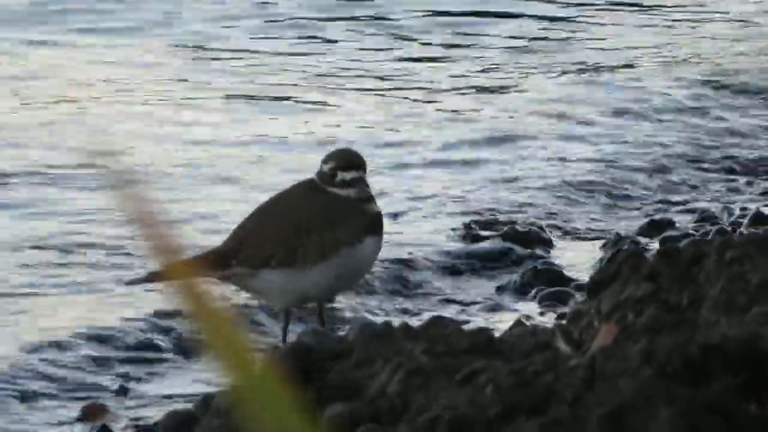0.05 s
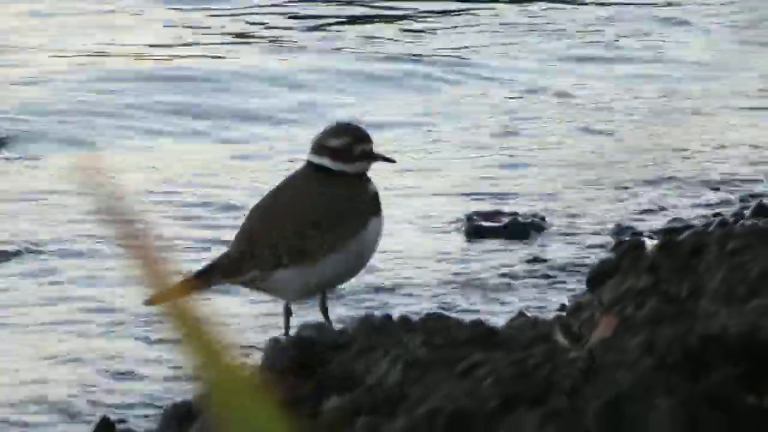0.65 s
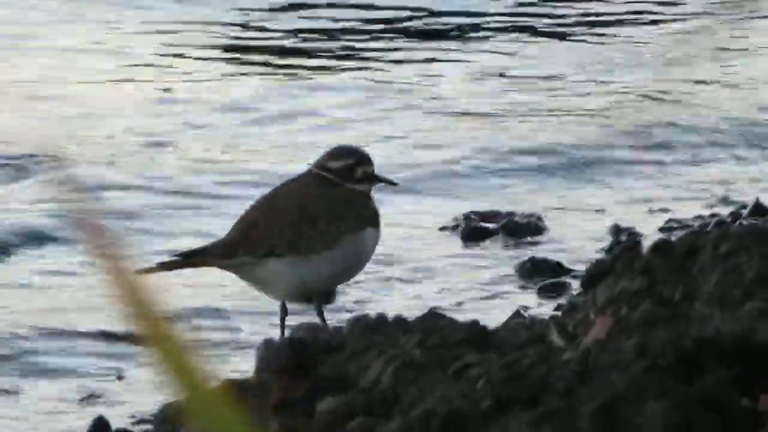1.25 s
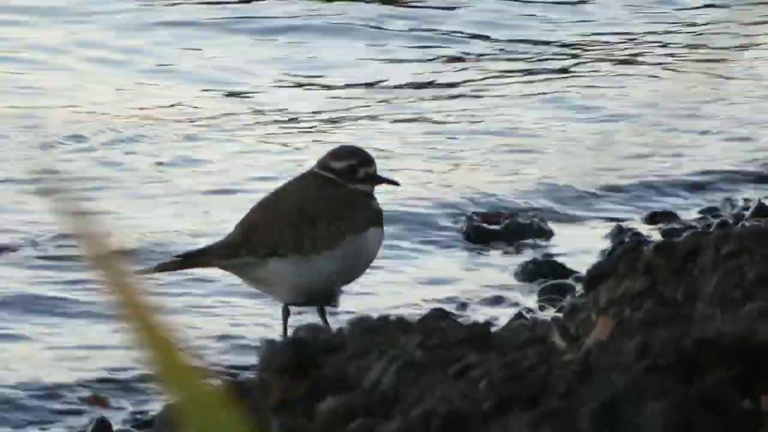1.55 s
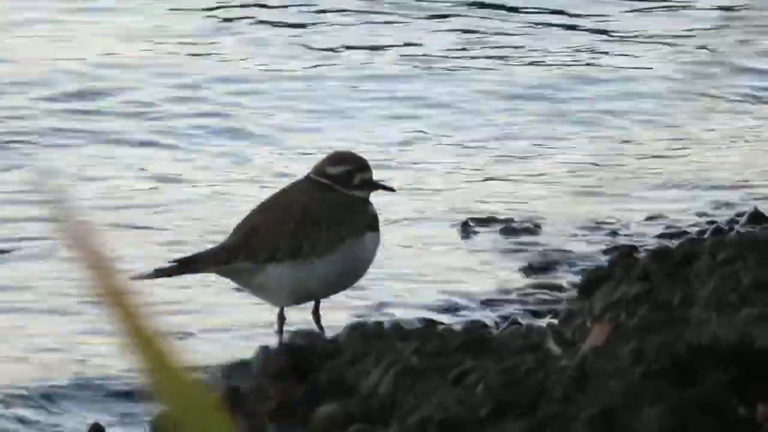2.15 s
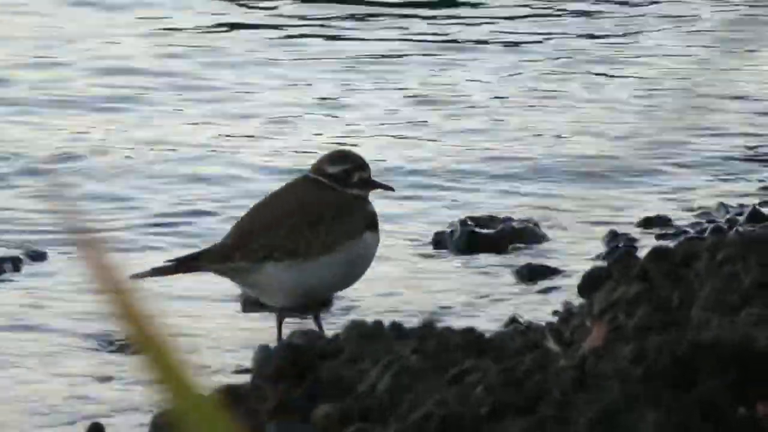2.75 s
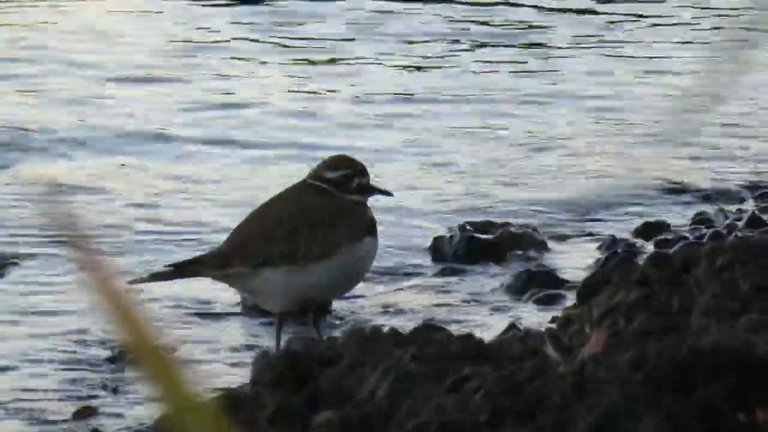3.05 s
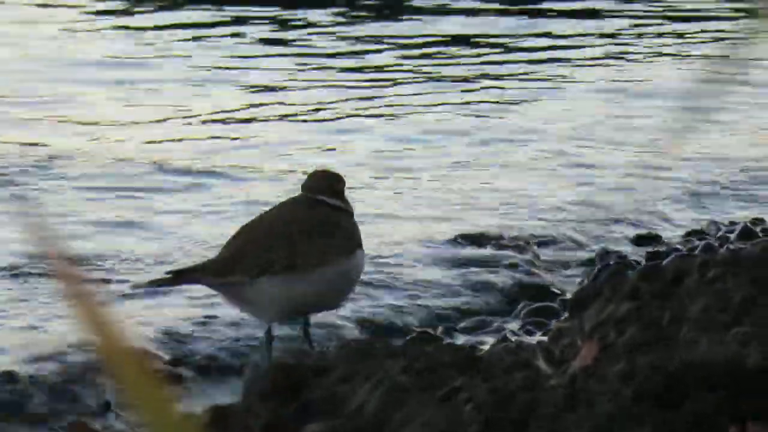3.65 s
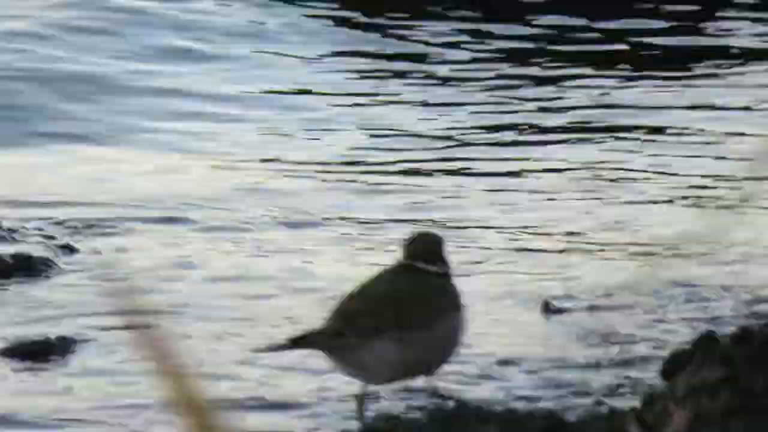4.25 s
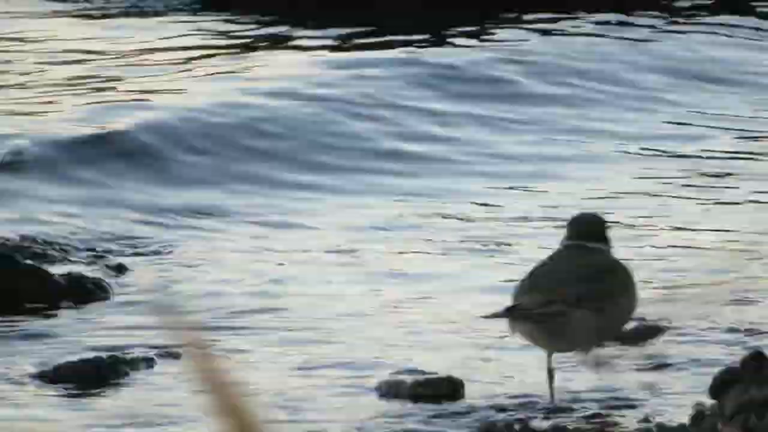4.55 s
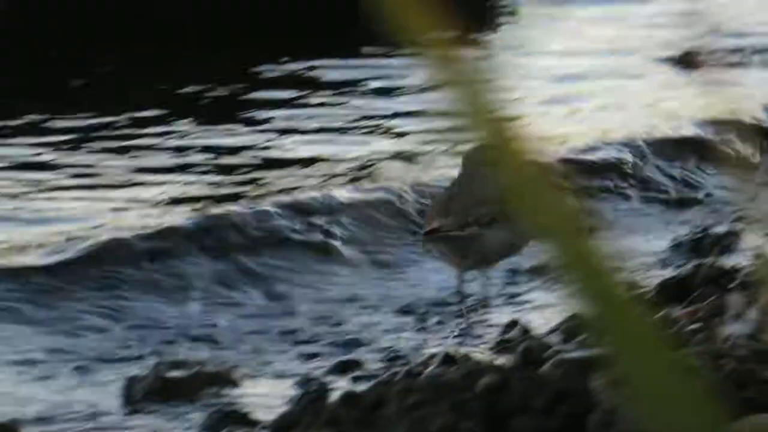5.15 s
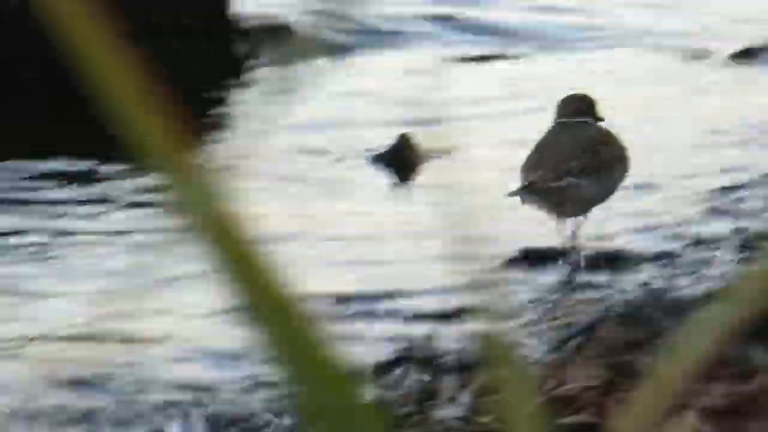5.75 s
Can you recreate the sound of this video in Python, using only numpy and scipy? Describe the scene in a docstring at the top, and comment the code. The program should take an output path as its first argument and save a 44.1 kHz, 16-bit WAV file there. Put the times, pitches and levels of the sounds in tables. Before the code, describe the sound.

A steady low rumble of far traffic and a light breeze lie behind gentle lapping at a rocky water's edge. Wavelets arrive about every half second, bubbling, dripping and leaving a fine crackle of foam. A few soft whistles and short reedy yelps of a water bird echo from the bank, then a faint high chirping follows in a lull before one last deeper wave. Two microphones stand close to the waterline.

```python
"""A stony shore in a light, hissing breeze, with a distant road rumbling across the water.
Small waves fizz and gulp between the stones, throw splashes and drops and leave crackling foam;
each of these sounds is built from damped oscillations, the ringing of air bubbles trapped in water.
A water bird yelps in reedy harmonics that echo from the bank, thin whistles answer and a small bird
chirps far off. Two close microphones hear the scene, with the bass in mono."""
import sys
import numpy as np
from scipy import signal
from scipy.fft import rfft, irfft
from scipy.io import wavfile
from scipy.ndimage import uniform_filter1d

SR = 44100
rng = np.random.default_rng(int(sys.argv[2]) if len(sys.argv) > 2 else 0)


def store_pcm(level_fs):
    """Save levels as 16-bit WAV."""
    pcm = np.round(np.clip(level_fs, -1, 1) * 32767).astype(np.int16)
    wavfile.write(sys.argv[1], SR, np.atleast_2d(pcm).T)


N = 255780
TIME = np.arange(N) / SR
FREQS = np.maximum(np.arange(N // 2 + 1) * SR / N, 1)

# wavelets reaching the stones: crest t/s, run-up/s, wash level/dB, gulp level/dB, crackle level/dB
WAVELETS = [(.74, .09, -58, -53, -70), (1.12, .12, -60, -54, -79), (1.38, .1, -61, -54, -79),
            (1.85, .1, -58.5, -53, -70), (2.29, .08, -63, -56, -73), (2.71, .06, -61, -54, -72),
            (3.27, .15, -57.5, -49, -69), (3.71, .17, -55, -44, -68), (4.15, .1, -63, -56, -73),
            (5.68, .17, -57.5, -39, -73)]


def undb(db):
    """Amplitude ratio of a level in decibels."""
    return 10 ** (np.asarray(db) / 20)


def level(x, db):
    """Normalisation to an rms level."""
    return x * undb(db) / np.sqrt(np.mean(x ** 2))


def add(out, t, x):
    """Superposition: x joins out from time t on."""
    start = max(int(t * SR), 0)
    part = out[..., start:start + x.shape[-1]]
    part += x[..., :part.shape[-1]]


def walk(rate_hz):
    """Random modulation: held values, smoothed twice, with a spread near 1."""
    held = rng.standard_normal(512)[(TIME * rate_hz).astype(int) % 512]
    width = int(SR / rate_hz)
    return 1.3 * uniform_filter1d(uniform_filter1d(held, width), width)


def restless_noise(colour, flicker_db, rate_hz):
    """Amplitude modulation of coloured noise: each octave band wavers independently."""
    hz, db = np.transpose(colour)
    spectrum = rfft(rng.standard_normal(N)) * undb(np.interp(np.log(FREQS), np.log(hz), db))
    octave = np.log2(FREQS / 16)
    bands = (irfft(spectrum * np.maximum(1 - abs(octave - k), 0), N) for k in range(12))
    return sum(band * undb(flicker_db * walk(rate_hz)) for band in bands)


def place(x, pan_db, lag_s_per_db=1.2e-5, shadow_hz=560):
    """Time and level difference: the nearer microphone leads and, above the bass, is louder; + is left."""
    hz = np.arange(len(x) // 2 + 1) * SR / len(x)
    lead = np.exp(1j * np.pi * hz * pan_db * lag_s_per_db)
    left = lead * undb(pan_db / 2 * hz ** 2 / (hz ** 2 + shadow_hz ** 2))
    return irfft(rfft(x) * np.array([left, 1 / left]), len(x))


def road(drone_hz=124.5):
    """Broadband and tonal noise: far engines rumble, tyres roar, and one engine drones in two harmonics."""
    # traffic spectrum: f/Hz, relative level/dB
    colour = [(18, -23), (35, -5), (66, 0), (115, .5), (185, -6), (330, -12.8), (500, -13.4), (800, -11.3),
              (1350, -21.2), (1900, -33), (3000, -42), (6000, -55), (12000, -70)]
    # one engine's drone: t/s, fundamental level/dB, octave level/dB
    drone_levels = [(0, -55, -61), (.7, -47, -56), (1.3, -49, -45), (1.9, -49, -46.5), (2.4, -48, -54),
                    (3.3, -52, -57), (5.8, -55, -59)]
    roar = level(restless_noise(colour, flicker_db=.5, rate_hz=5), -32.1) * undb(.25 * walk(1.2))
    times, *levels_db = np.transpose(drone_levels)
    fundamental, octave = (undb(np.interp(TIME, times, db)) for db in levels_db)
    phase = 2 * np.pi * np.cumsum(drone_hz + .6 * walk(4)) / SR
    drone = np.sqrt(2) * (fundamental * np.sin(phase) + octave * np.sin(2 * phase))
    return place(roar + drone * undb(2 * walk(5)), pan_db=2)


def breeze(db=-49.5, side_db=-1):
    """Diffuse field: a soft hiss from all sides is only weakly correlated between the microphones."""
    # spectrum of breeze and far water: f/Hz, relative level/dB
    colour = [(100, -8), (220, -3), (430, 0), (540, -3), (1000, -.8), (2000, -6.8), (3200, -11.3),
              (5000, -14.6), (10000, -23.8), (13500, -29.3), (15300, -35)]
    mid, side = (level(restless_noise(colour, flicker_db=.4, rate_hz=8), db) for _ in range(2))
    side *= undb(side_db)
    return np.array([mid + side, mid - side]) / np.sqrt(2)


def bubble(hz, cycles, glide=.12):
    """Damped oscillator: a bubble rings down by 40 dB, rising in pitch as it nears the surface."""
    age = np.linspace(0, 1, int(cycles * SR / hz) + 4)
    envelope = (1 - np.exp(-2 * cycles * age)) * np.exp(-np.log(100) * age)
    return envelope * np.sin(2 * np.pi * cycles * (age + glide * age ** 2 / 2))


def bubbles(count, centre_hz, spread, cycles, scatter_db, pans_db=(-1, 1.5, 4)):
    """Shot noise: bubbles ring at random times along the waterline, most faint, a few strong; rms 1."""
    sides = np.zeros((3, N))
    for k, (when, pitch, size, ring) in enumerate(rng.random((count, 4))):
        hz = np.clip(centre_hz * (pitch / (1 - pitch)) ** (spread / 2), 120, 14000)
        size_db = -scatter_db * np.log(max(size, .02))
        add(sides[k % 3], when * N / SR, undb(size_db) * bubble(hz, cycles * (.5 + ring)))
    return level(sum(place(x, pan_db) for x, pan_db in zip(sides, pans_db)), 0)


def surge(crest_s, run_up_s, slower=1, drain_s=.17):
    """Exponential growth and decay: a wavelet's flow builds to its crest, then drains away."""
    age = (TIME - crest_s) / slower
    return np.exp(np.minimum(age / run_up_s, -age / drain_s))


def wash(calm_flow_db=-66, calm_gulp_db=-55):
    """Bubble resonance: small bubbles fizz and trickle, large ones gulp; the wavelets add in power."""
    fizz = bubbles(count=6000, centre_hz=4200, spread=.58, cycles=11, scatter_db=2.8)
    trickle = bubbles(count=1700, centre_hz=2000, spread=.4, cycles=18, scatter_db=2.4)
    gulps = bubbles(count=1000, centre_hz=350, spread=.7, cycles=7, scatter_db=2.2)
    flow_power, gulp_power = undb(calm_flow_db) ** 2, undb(calm_gulp_db) ** 2
    for t, run_up_s, wash_db, gulp_db, _ in WAVELETS:
        flow_power += (undb(wash_db) * surge(t, run_up_s)) ** 2
        gulp_power += (undb(gulp_db) * surge(t, run_up_s, slower=1.5)) ** 2  # hollows fill and empty
    running = undb(-3.8) * fizz + undb(.5) * trickle
    return running * np.sqrt(flow_power) + gulps * np.sqrt(gulp_power)


def plips(db=-65.5):
    """Stationary random process: stray bubbles pop between the stones all the time."""
    return undb(db) * bubbles(count=200, centre_hz=2000, spread=.3, cycles=22, scatter_db=1.8)


def plops():
    """Free oscillation: single pockets of air ring as the water closes over them."""
    # air pockets: t/s, level/dB, f/Hz
    pockets = [(.161, -39, 2050), (.786, -35.5, 3450), (.791, -39, 2600), (.815, -44, 3600),
               (.862, -39, 2450), (1.342, -39, 2480), (1.843, -35, 2660), (1.856, -38, 2350),
               (1.911, -38, 1630), (1.99, -29, 1820), (2.007, -33, 1920), (2.019, -37, 1800),
               (2.686, -40, 3300), (3.151, -35, 2600), (3.276, -38, 2950), (3.339, -42, 4500),
               (3.422, -41, 2560), (3.435, -42, 4100), (3.628, -37, 2450), (3.661, -32, 2050),
               (3.676, -36, 2200), (3.729, -34, 1750), (3.92, -41, 2850), (4.108, -31, 1450),
               (4.126, -33, 1450), (4.546, -36.5, 2350), (5.66, -40, 2650), (5.714, -33, 350),
               (5.721, -33, 1700), (5.751, -39, 3250), (5.781, -36, 2000)]
    out = np.zeros(N)
    for t, db, hz in pockets:
        add(out, t, undb(db) * bubble(hz, cycles=20))
    return place(out, pan_db=2.2)


def drops(cycles=10, droplets=4, scatter_s=.012, droplet_db=-11):
    """Impact transients: tiny drops tick on the nearest stones and scatter into fainter droplets."""
    # drop impacts: t/s, level/dB, f/Hz, pan/dB
    impacts = [(.384, -46, 11000, 2), (.465, -46, 13000, .8), (.693, -48, 13500, 1), (.717, -47, 8500, 1),
               (.78, -43.5, 13300, .4), (.788, -41, 5100, 1), (.855, -47, 11000, .8),
               (1.189, -43.5, 13000, .9), (1.215, -42, 13000, .9), (1.797, -42, 7000, 2.6),
               (1.819, -44, 11000, 2.5), (1.856, -40, 10500, 2.6), (1.912, -46, 9500, 2.6),
               (2.052, -38, 6300, 2.2), (2.084, -43, 6900, 2.2), (2.221, -45, 13000, 2.7),
               (2.274, -37, 5400, 2.2), (2.385, -42, 12500, 2.4), (2.54, -45, 13500, .8),
               (2.639, -38, 13000, 1.5), (2.692, -43, 7000, 1.2), (2.725, -45, 13000, 1.6),
               (2.803, -46, 13000, 1.7), (3.063, -43, 5900, 2), (3.101, -45, 10500, 2.2),
               (3.555, -43, 8000, 2), (3.615, -33, 4400, 2.2), (3.679, -42, 5900, 2.2),
               (3.707, -41, 6250, 2.2), (3.748, -31, 4600, 2.2), (3.798, -44, 12000, 2.7),
               (4.003, -42, 11500, 2.4), (4.083, -41, 12500, 2.7), (4.236, -44, 12500, 2.7),
               (5.598, -44, 11500, 2.7)]
    out = np.zeros((2, N))
    for t, db, hz, pan_db in impacts:
        tick = np.zeros(SR // 20)
        add(tick, 0, bubble(hz, cycles))
        for when, pitch in rng.random((droplets, 2)):
            add(tick, scatter_s * when, undb(droplet_db) * bubble(hz * (1 - pitch / 2), cycles / 2))
        add(out, t, undb(db) * place(tick, pan_db))
    return out


def splashes(count=32, spread=.17, spray_db=-15, spray_ratio=2.3):
    """Air entrainment: a crest folds over a stone, trapping like-sized bubbles under a finer spray."""
    # folding crests: t/s, rms level/dB, bubble f/Hz, duration/s
    crests = [(.69, -58, 2900, .055), (.778, -57, 3200, .025), (.857, -57, 2500, .016),
              (.887, -57, 2800, .028), (1.338, -55.5, 2300, .07), (1.492, -48, 1250, .025),
              (1.53, -55, 2100, .08), (1.835, -58, 2400, .03), (1.986, -47, 1400, .035),
              (2.683, -58.5, 2900, .06), (3.264, -54, 2800, .045), (3.545, -57, 2700, .018),
              (3.648, -49.5, 1900, .035), (3.75, -53.5, 1800, .06), (3.895, -59, 2950, .035),
              (5.53, -58, 3200, .07), (5.645, -58, 2600, .07), (5.673, -35, 520, .008),
              (5.66, -46, 750, .06), (5.69, -53, 1600, .08)]
    out = np.zeros(N)
    for t, db, hz, duration in crests:
        cluster = np.zeros(SR // 8)
        for k, (when, pitch, size, fine) in enumerate(rng.standard_normal((count, 4))):
            onset = duration * (k + .4 * when) / count
            spray_hz = min(spray_ratio * hz * np.exp(.45 * fine), SR / 3)
            add(cluster, onset, undb(2.2 * size) * bubble(hz * np.exp(spread * pitch), cycles=14))
            add(cluster, onset, undb(spray_db) * bubble(spray_hz, cycles=5))
        cluster *= undb(db) * np.sqrt(duration * SR / np.sum(cluster ** 2))
        add(out, t, cluster)
    return place(out, pan_db=2.2)


def crackle():
    """Modulated shot noise: foam on the stones to the left bursts in tiny ticks after each wavelet."""
    ticks = bubbles(count=2600, centre_hz=11500, spread=.33, cycles=7, scatter_db=4.2,
                    pans_db=(2, 2.6, 3.1))
    foam_power = sum((undb(db) * surge(t, run_up_s=.04, slower=1.6)) ** 2 for t, *_, db in WAVELETS)
    return ticks * np.sqrt(foam_power)


def note(duration, pitches, harmonics_db, rough, quaver_s, swell=.7):
    """Frequency and amplitude modulation: a bird's note bends and quavers as it swells and fades."""
    age = np.linspace(0, 1, int(duration * SR))
    contour = np.polyfit(np.linspace(0, 1, len(pitches)), pitches, len(pitches) - 1)
    steps = age * duration / quaver_s
    jitter, shimmer = (np.interp(steps, np.arange(64), r) for r in rng.standard_normal((2, 64)))
    phase = 2 * np.pi * np.cumsum(np.polyval(contour, age) * (1 + rough * jitter)) / SR
    tone = sum(undb(db) * np.sin(k * phase) for k, db in enumerate(harmonics_db, 1))
    return np.sqrt(2) * tone * undb(1.5 * shimmer) * abs(np.sin(np.pi * age)) ** swell


def echoes(x, t60, wet_db, delay_s=.008):
    """Reverberation: scattered returns from the banks decay exponentially, unlike at each microphone."""
    t = TIME[:SR]
    tail = rng.standard_normal((2, SR)) * undb(-60 * t / t60) * (t > delay_s)
    tail *= undb(wet_db) / np.sqrt(np.sum(tail ** 2, axis=1, keepdims=True))
    return signal.fftconvolve(x[None], tail, axes=1)[:, :N]


def phrase(notes, rough, quaver_s, swell):
    """Gliding tones: a bird's run of notes, each a fundamental without overtones."""
    out = np.zeros(N)
    for t, duration, db, *pitches in notes:
        add(out, t, undb(db) * note(duration, pitches, [0], rough, quaver_s, swell))
    return out


def whistles():
    """Nearly pure tones: thin quavering notes rise and fall in an arc, blurred by distance."""
    # whistled notes: t/s, duration/s, level/dB, start f/Hz, middle f/Hz, end f/Hz
    notes = [(1.221, .062, -51, 2080, 2340, 1900), (1.337, .05, -58, 2420, 2650, 2520),
             (1.496, .057, -49, 2100, 2270, 2020), (1.792, .032, -53.5, 1960, 2050, 1920)]
    call = phrase(notes, rough=.024, quaver_s=.0012, swell=.35)
    return place(call, pan_db=2.2) + echoes(call, t60=.55, wet_db=-7.5)


def water_bird(throat_hz=2400, throat_width_hz=500, rise_hz_per_s=4700):
    """Source and filter: reedy rising yelps pass a throat resonance on the left and echo on the right."""
    # yelps: t/s, duration/s, start f/Hz, level/dB, tilt/(dB per harmonic), throat gain/dB
    yelps = [(1.474, .016, 808, -41.5, 1.1, -5), (1.495, .013, 740, -41.5, -1.5, -3),
             (3.126, .015, 730, -36, -.7, 3), (4.164, .022, 767, -37.5, 0, 1.5)]
    # voice spectrum, from the fundamental up: relative level/dB
    voice_db = [0, 0, -3.5, -15, -29, -27, -32, -26, -27, -31]
    # reflections from the bank: delay/s, relative level/dB
    reflections = [(.056, -17), (.078, -17), (.116, -20)]
    out = np.zeros(N)
    k = np.arange(len(voice_db))
    for t, duration, hz, db, tilt_db, throat_db in yelps:
        throat = np.exp(-(((k + 1) * hz - throat_hz) / throat_width_hz) ** 2)
        harmonics_db = voice_db + tilt_db * k + throat_db * throat
        pitches = (hz, hz + rise_hz_per_s * duration)
        add(out, t, undb(db) * note(duration, pitches, harmonics_db, rough=.022, quaver_s=.0008))
    bank = sum(undb(db) * np.interp(TIME - delay, TIME, out) for delay, db in reflections)
    return place(out, pan_db=3) + place(bank, pan_db=-1.8) + echoes(out, t60=.7, wet_db=-9, delay_s=.012)


def small_bird():
    """Direct-to-reverberant ratio: a far, high chirp is only a little stronger than its echoes."""
    # chirped notes: t/s, duration/s, level/dB, start f/Hz, middle f/Hz, end f/Hz
    notes = [(4.562, .055, -57, 4850, 4890, 4860), (4.578, .034, -57, 4760, 4560, 4620),
             (4.602, .062, -59, 4270, 4170, 4300), (4.618, .064, -62.5, 4740, 4860, 4690),
             (4.688, .05, -64, 4320, 4260, 4270), (4.731, .068, -59.5, 4260, 4280, 4130),
             (4.806, .026, -62, 4180, 4220, 4150), (4.862, .06, -67, 4200, 4180, 4220)]
    call = phrase(notes, rough=.012, quaver_s=.002, swell=.7)
    return place(call, pan_db=-1) + echoes(call, t60=.85, wet_db=-3)


def scene():
    """Linear superposition: road and breeze lie behind the water and the birds."""
    far_birds = whistles() + small_bird()
    water = wash() + crackle() + plips() + splashes() + plops() + drops()
    return road() + breeze() + water + water_bird() + far_birds


def record(dry, mono_hz=205, top_hz=15000):
    """Mid-side filtering: the bass folds to mono, and a steep low-pass cuts the top."""
    mid, side = (dry[0] + dry[1]) / 2, (dry[0] - dry[1]) / 2
    side = irfft(rfft(side) / (1 + (mono_hz / FREQS) ** 8), N)
    low_pass = signal.ellip(8, .2, 70, top_hz, fs=SR, output="sos")
    return signal.sosfilt(low_pass, np.array([mid + side, mid - side]))


dry = scene()
out = record(dry)
store_pcm(out)
```